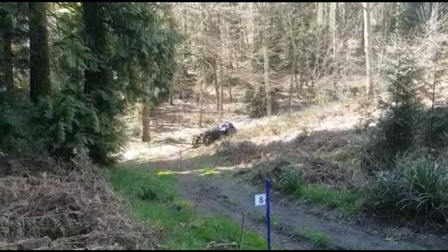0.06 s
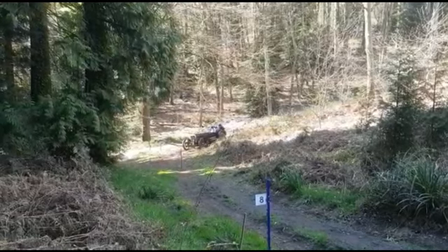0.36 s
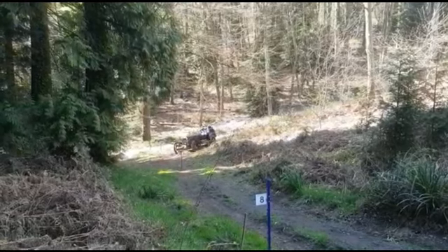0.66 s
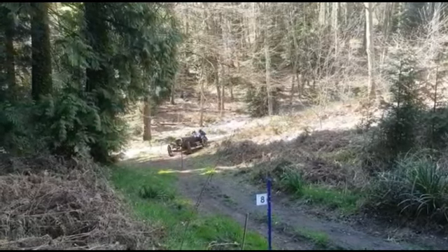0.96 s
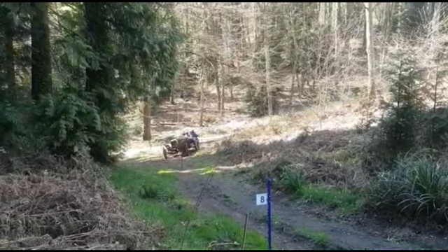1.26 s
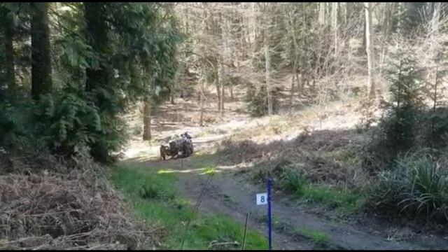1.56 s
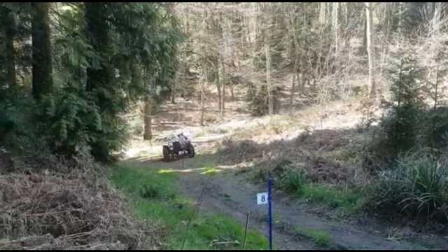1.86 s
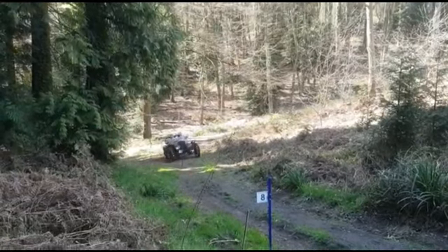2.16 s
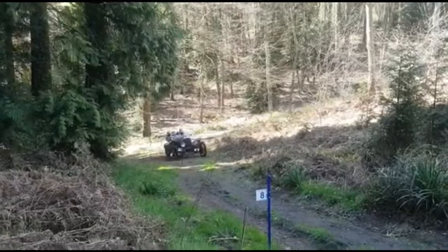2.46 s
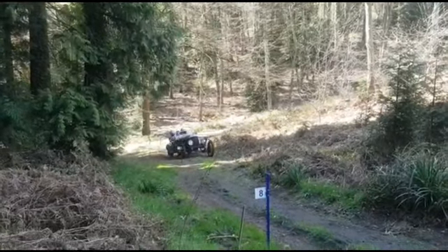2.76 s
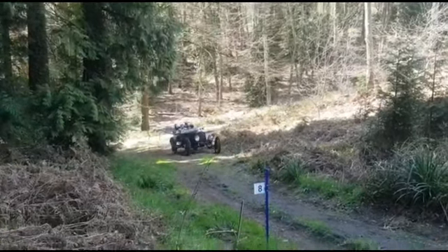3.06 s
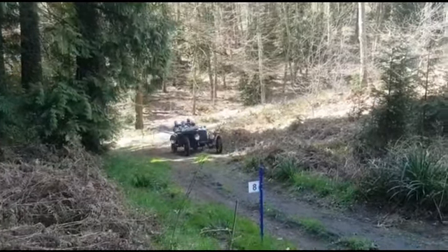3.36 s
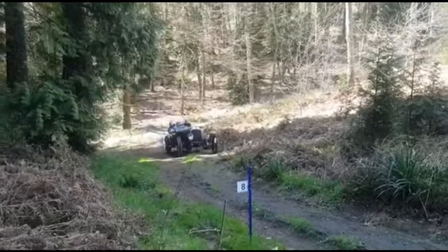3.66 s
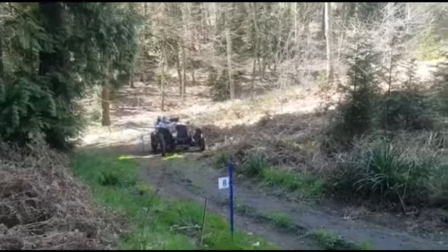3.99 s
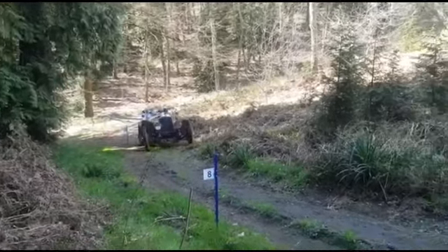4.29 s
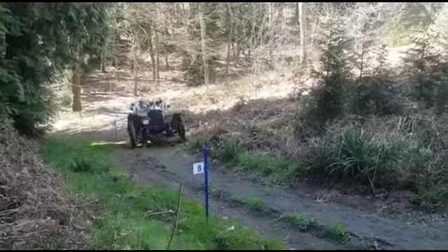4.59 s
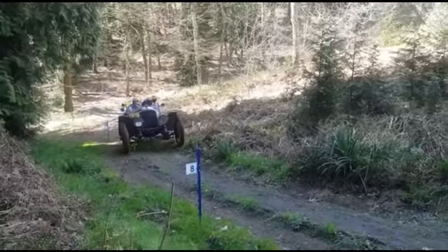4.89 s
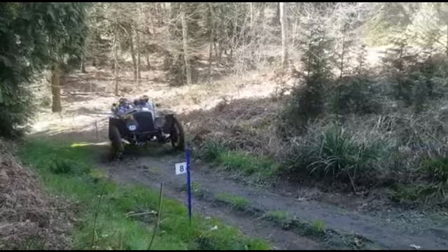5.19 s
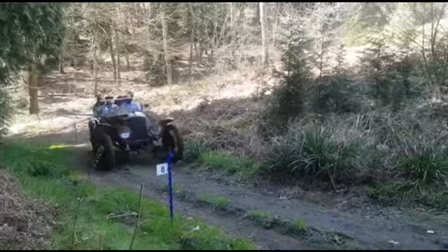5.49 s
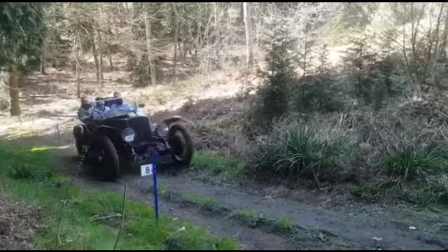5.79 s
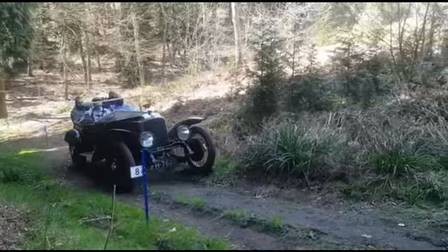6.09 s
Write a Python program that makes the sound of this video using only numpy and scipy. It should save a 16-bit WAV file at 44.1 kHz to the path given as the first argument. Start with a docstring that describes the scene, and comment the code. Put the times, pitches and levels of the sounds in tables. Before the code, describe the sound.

An old car engine chugs and revs unevenly through the woods, drawing closer with light metal rattles and tyres hissing on grit.

```python
"""A vintage four-cylinder car labours along a woodland dirt track towards the listener.
Its exhaust is a pulse train, two firings to a crank turn, which booms and barks at each press of the
throttle. Meshing gears whine, block and valves clatter, tyres hiss over grit, and bumps set the chassis
ringing. Dry twigs snap close by, short squeaks glide past, and the tree trunks scatter the sound."""
import sys
import numpy as np
from scipy import signal
from scipy.fft import rfft, irfft, next_fast_len
from scipy.io import wavfile
from scipy.ndimage import uniform_filter1d

SR = 44100
rng = np.random.default_rng(int(sys.argv[2]) if len(sys.argv) > 2 else 0)


def int16_out(signal):
    """Quantize to a 16-bit WAV file."""
    q = np.round(np.clip(np.atleast_2d(signal).T, -1, 1) * 32767)
    wavfile.write(sys.argv[1], SR, q.astype(np.int16))


N = 275208
SIZE = next_fast_len(N + SR // 8, real=True)
TIME, FREQ = np.arange(N) / SR, np.fft.rfftfreq(SIZE, 1 / SR)
COASTING_DB = -34.5  # the firing note from afar, throttle shut
# Overtones of the exhaust: cycles_per_turn
EXHAUST_ORDERS = [5, 6, 7, 8, 9, 10]


def amp(db):
    """Decibels to amplitude ratio."""
    return 10 ** (np.asarray(db) / 20)


def unit(x):
    """Normalisation to an rms of 1."""
    return x / np.sqrt(np.mean(x ** 2) + 1e-20)


def curve(points):
    """Linear interpolation of (time_s, value) points at every sample."""
    return np.interp(TIME, *np.transpose(points))


def read(points, hz):
    """Interpolation of (frequency_hz, value) points on a logarithmic frequency axis."""
    point_hz, value = np.transpose(points)
    return np.interp(np.log(hz + 1), np.log(point_hz + 1), value)


def filtered(x, response):
    """Linear filtering: the spectrum is multiplied by a frequency response."""
    return irfft(rfft(x, SIZE) * response, SIZE)[..., :N]


def colour(x, spectrum):
    """Minimum-phase filtering: the phase follows from the log gain by the Hilbert transform."""
    hz = abs(np.fft.fftfreq(4096, 1 / SR))
    log_gain = np.log(amp(read(spectrum, hz)))
    taps = np.fft.ifft(np.exp(signal.hilbert(log_gain)).conj()).real
    return filtered(x, rfft(taps[:len(taps) // 2], SIZE))


def ring(x, hz, width_hz):
    """A second-order resonance with a peak gain of 1."""
    return signal.lfilter(*signal.iirpeak(hz, hz / width_hz, SR), x)


def drift(rate_hz, count=8192):
    """Random modulation: low-passed Gaussian noise with an rms of 1."""
    lowpass = np.exp(-(np.fft.rfftfreq(count, TIME[-1] / count) / rate_hz) ** 2)
    slow = irfft(rfft(rng.standard_normal(count)) * lowpass)
    return np.interp(TIME, np.linspace(0, TIME[-1], count), unit(slow))


def spread(pair):
    """Partial coherence: the sum and difference of two unrelated signals give left and right."""
    # Likeness of the two channels: frequency_hz, correlation
    coherence = [(130, 0.2), (290, 0.31), (640, 0.16), (1400, 0.99), (3100, 0.5), (7000, 0.053)]
    alike = read(coherence, FREQ)
    common, apart = filtered(pair, np.sqrt([(1 + alike) / 2, (1 - alike) / 2]))
    return np.array([common + apart, common - apart])


def stereo_noise():
    """White noise, partly coherent between left and right."""
    return spread(rng.standard_normal((2, N)))


def at_level(pair, db):
    """Gain control: the running rms of the channels' mean follows a level curve."""
    power = uniform_filter1d(pair.mean(0) ** 2, size=8000)
    return amp(db) * pair / np.sqrt(abs(power) + 1e-20)


def blows(starts_s, levels_db, rise_s, decay_s):
    """Impact excitation: noise bursts with a fast rise and an exponential decay."""
    t = np.arange(SR // 5) / SR
    shape = (1 - np.exp(-t / rise_s)) * np.exp(-t / decay_s)
    impulses = np.zeros(N)
    np.add.at(impulses, (starts_s * SR).astype(int), amp(levels_db))
    return signal.fftconvolve(impulses, shape / shape.max())[:N] * stereo_noise()


def bursts(turns, decay_strokes, uneven_db):
    """Modulation at the firing rate: an envelope jumps twice a turn to a random height and decays."""
    stroke = (2 * turns).astype(int)
    strength = np.clip(rng.standard_normal(N), -2, 1.4)
    return amp(uneven_db * strength[stroke]) * np.exp(-(2 * turns % 1) / decay_strokes)


def orders(turns, multiples, levels_db, flutter_db, smear_rad):
    """Multipath fading: tones at multiples of the crank speed waver in level and phase."""
    tones = (amp(db + flutter_db * drift(18)) * np.cos(2 * np.pi * k * turns + smear_rad * drift(29))
             for k, db in zip(multiples, levels_db))
    return np.sqrt(2) * sum(tones)


def trees(x, wet_db, echoes_per_s=1500, onset_s=0.0033, path_shift_hz=0.35):
    """Scattering: trunks add sparse echoes whose treble dies first; the paths shift as the car moves."""
    # Reverberation time of the wood: frequency_hz, t60_s
    reverberation = [(100, 0.88), (500, 1), (2000, 0.47), (6000, 0.37), (15000, 0.35)]
    taps = rng.standard_normal((2, 2, SR)) * (rng.random((2, 2, SR)) < echoes_per_s / SR)
    hz, t, spectra = signal.stft(taps, SR, nperseg=256)
    decay = amp(-60 * t / read(reverberation, hz)[:, None])
    tails = signal.istft(spectra * decay * np.minimum(t / onset_s, 1), SR, nperseg=256)[1]
    angle = 2 * np.pi * path_shift_hz * TIME
    echoes = np.zeros((2, N))
    for share, tail in zip((np.cos(angle), np.sin(angle)), tails):  # crossfade two sets of paths
        response = tail / np.linalg.norm(tail[0])
        echoes += signal.fftconvolve(np.atleast_2d(x * share), response, axes=1)[:, :N]
    return x + amp(wet_db) * spread(echoes)


def squeaks(roughness=0.028):
    """Frequency modulation: short, rough glides, as of springs or far birds."""
    # Squeaks and chirps: start_s, length_s, start_hz, end_hz, level_db
    glides = [(0.866, 0.11, 4050, 4920, -54), (2.3, 0.045, 4180, 2760, -44.5),
              (3.165, 0.028, 2836, 2800, -40.5), (3.485, 0.016, 3150, 3120, -46.5),
              (6.16, 0.011, 3740, 2920, -29)]
    wobble = 1 + roughness * drift(310)
    out = np.zeros(N)
    for start_s, length_s, start_hz, end_hz, level_db in glides:
        progress = np.clip((TIME - start_s) / length_s, 0, 1)
        pitch_hz = (start_hz + (end_hz - start_hz) * progress) * wobble
        out += amp(level_db) * np.sin(np.pi * progress) * np.sin(2 * np.pi * np.cumsum(pitch_hz) / SR)
    return trees(out, wet_db=-6)


def twigs():
    """Brittle fracture: each dry twig gives a bright crack and a damped, woody knock."""
    # Twig snaps: start_s, crack_db, knock_db
    snaps = [(0.397, -43, -41), (0.438, -44, -36), (0.45, -32, -50), (0.4623, -39, -39.5),
             (0.486, -53, -36), (0.575, -44, -37.5), (0.609, -63, -36), (0.6626, -58, -40.5)]
    # Spectrum of a crack: frequency_hz, gain_db
    crack_spectrum = [(1000, -1), (4500, 18), (6200, -9), (8000, 12), (12000, -2), (15500, -6)]
    starts_s, crack_db, knock_db = np.transpose(snaps)
    cracks = colour(blows(starts_s, crack_db - 13, rise_s=0.00055, decay_s=0.0016), crack_spectrum)
    knocks = ring(blows(starts_s, knock_db + 8, rise_s=0.00028, decay_s=0.0027), hz=2140, width_hz=930)
    return trees(cracks, wet_db=-5.5) + trees(knocks, wet_db=0.5)


def clinks(starts_s, levels_db, attack_s=0.001):
    """Free vibration: loose metalwork rings in damped modes after each jolt, never quite alike."""
    # Modes of the metalwork: pitch_hz, level_db, t60_s
    metal_modes = [(2070, 3.5, 0.069), (2280, 3, 0.079), (2805, -2.5, 0.039), (3200, 3, 0.042),
                   (4280, -11, 0.065), (5020, -1, 0.036)]
    pitch_hz, mode_db, t60_s = np.transpose(metal_modes)[:, :, None]
    out, t = np.zeros(N + SR), np.arange(SR // 5) / SR
    for start_s, level_db in zip(starts_s, levels_db):
        detune, strength, phase = rng.standard_normal((3, len(metal_modes), 1))
        envelopes = amp(mode_db + 2 * strength - 60 * t / t60_s)
        modes = envelopes * np.sin(2 * np.pi * (pitch_hz * (1 + 0.012 * detune) * t + phase))
        out[int(start_s * SR):][:len(t)] += amp(level_db) * modes.sum(0) * np.minimum(t / attack_s, 1)
    return out[:N]


def rattles():
    """Shock excitation: bumps drive the resonances of panels, fittings and metalwork."""
    # Jolts of the chassis: start_s, panel_db, fitting_db
    jolts = [(4.166, -49, -71), (1.327, -48, -67), (1.396, -58, -63.5), (1.655, -49.5, -65.5),
             (1.825, -60, -82), (1.945, -55.5, -64.5), (2.033, -54, -67.5), (4.273, -51.5, -67),
             (2.573, -47, -67), (2.667, -54, -64.5), (3.656, -50, -74), (3.959, -49.5, -63),
             (4.017, -51, -68), (4.344, -60, -76), (4.449, -50.5, -61.5), (4.525, -46, -64),
             (4.855, -53, -81), (4.995, -51, -73), (5.084, -49, -62), (5.231, -46, -59.5),
             (5.342, -52, -62), (5.398, -42.5, -60), (5.928, -40.5, -56.5), (5.982, -44, -60),
             (6.022, -43, -57.5), (6.114, -41.5, -60), (6.199, -41, -73)]
    # Response of the panels: frequency_hz, gain_db
    panel_spectrum = [(500, -35), (1000, 19), (1600, 14), (2150, 21.5), (3100, 13.5), (4200, 10),
                      (6200, -61.5), (15000, -99.5)]
    # Response of the small loose parts: frequency_hz, gain_db
    fitting_spectrum = [(2500, -32.5), (4400, 14.5), (5300, 6.5), (6300, -6), (8000, 1.5), (9500, -7),
                        (11500, 4), (15500, -51)]
    starts_s, panel_db, fitting_db = np.transpose(jolts)
    panels = colour(blows(starts_s, panel_db - 5, rise_s=0.00029, decay_s=0.015), panel_spectrum)
    fittings = colour(blows(starts_s, fitting_db + 10, rise_s=0.0012, decay_s=0.016), fitting_spectrum)
    return trees(panels + fittings + clinks(starts_s, panel_db), wet_db=-4.5)


def grit(level_db, grains_per_s=450, grain_db=-4):
    """Shot noise: tyres grinding over dirt give separate random clicks within a fine hiss."""
    # Spectrum of tyres on grit: frequency_hz, gain_db
    tyre_spectrum = [(1500, -17.5), (4500, -8), (6200, -23.5), (7800, -13.5), (9400, -21.5), (11000, -9.5),
                     (12000, -9), (13500, -17), (15600, -21.5)]
    contacts = rng.random((2, N)) < grains_per_s / SR
    grains = contacts * amp(4.6 * np.minimum(rng.exponential(1, (2, N)), 5) + 3.2 * drift(18))
    hiss = unit(rng.standard_normal((2, N))) + amp(grain_db) * unit(grains)
    ruts_db = 2.5 * drift(8.5)
    return at_level(colour(hiss, tyre_spectrum), level_db - 1 + ruts_db)


def whine(turns, speed, gain_db):
    """Gear meshing: tones at fixed multiples of the crank speed peak where the gearbox resonates."""
    # Meshing tones: cycles_per_turn
    mesh_orders = [13.5, 18, 22.5, 27]
    # Response of the gearbox: pitch_hz, level_db
    gearbox = [(480, -65), (515, -57.5), (560, -66), (640, -70), (720, -60), (790, -61.5), (850, -68),
               (960, -60), (1100, -65), (1400, -74)]
    levels_db = [gain_db + read(gearbox, k * speed) for k in mesh_orders]
    return trees(orders(turns, mesh_orders, levels_db, flutter_db=3, smear_rad=0.5), wet_db=-6)


def clatter(turns, level_db):
    """Structure-borne sound: the block radiates a knock each stroke over a hum of high crank orders."""
    # Response of the engine block: frequency_hz, gain_db
    block_spectrum = [(300, -48.5), (620, 1.5), (780, 4.5), (1000, -2), (1300, -4.5), (1650, -14),
                      (2200, -51), (6000, -90)]
    knocks = unit(stereo_noise() * (0.5 + bursts(turns, decay_strokes=1, uneven_db=9)))
    multiples = np.arange(19, 32)
    hum = orders(turns, multiples, np.full(len(multiples), -18), flutter_db=0, smear_rad=1.94)
    return at_level(trees(colour(knocks + hum, block_spectrum), wet_db=0.5), level_db - 0.3)


def valves(turns, level_db):
    """Directivity: the valve gear rasps in step with the crank, shrillest from the engine's side."""
    # Spectrum of the valve gear: frequency_hz, gain_db
    valve_spectrum = [(1000, -9.5), (1700, -5), (2000, 4.5), (2250, 2.5), (2450, -4.5), (3000, -20),
                      (3800, -17), (4900, -15), (6200, -32), (12000, -43)]
    # Shrill resonance as the engine's side turns to and from the listener: time_s, gain_db
    flank = [(0, 0), (1.4, 3.5), (1.75, -0.5), (3.7, -1), (4.7, -6), (6.24, -1.5)]
    ticks = stereo_noise() * (1 + bursts(turns, decay_strokes=0.52, uneven_db=12))
    shrill = ring(ring(ticks, hz=2700, width_hz=600), hz=2810, width_hz=830) * amp(curve(flank))
    return at_level(trees(colour(ticks, valve_spectrum) + shrill, wet_db=0), level_db - 0.6)


def firings(turns, alternate_db=2, uneven_db=2.5, jitter_s=0.0003):
    """A jittered pulse train: two firings a turn, alternately weaker and stronger."""
    onsets = np.flatnonzero(np.diff(np.floor(2 * turns)))
    size, lateness = rng.standard_normal((len(onsets), 2)).T
    onsets = np.clip(onsets + (lateness * jitter_s * SR).astype(int), 0, N - 1)
    pulses = np.zeros(N)
    pulses[onsets] = amp(uneven_db * size + alternate_db * (np.arange(len(onsets)) % 2))
    return unit(pulses)


def burble(turns, level_db, puff_db=2.5):
    """Source and filter: each firing sends a slug of gas and a rough puff through the resonant pipe."""
    # Response of the tailpipe: frequency_hz, gain_db
    pipe_spectrum = [(60, -27), (125, -5.5), (165, 3.5), (230, -7), (300, -16.5), (380, -17), (500, -16),
                     (620, -57.5), (900, -26), (2000, -90.5)]
    puffs = unit(stereo_noise() * (bursts(turns, decay_strokes=0.2, uneven_db=-11) - 1))
    gas = firings(turns) + amp(puff_db) * puffs
    lumps = amp(1.8 * drift(20))
    return at_level(trees(colour(gas * lumps, pipe_spectrum), wet_db=-6), level_db + 5)


def growl(turns, speed, burble_db):
    """Harmonics of the exhaust bend with the revs, swelling as they cross the pipe's resonances."""
    # Strength of an overtone against the burble: pitch_hz, gain_db
    overtone_spectrum = [(190, -7), (225, -6), (255, -10), (290, -1), (335, -11), (370, -15), (400, -6),
                         (435, -14), (505, -6), (550, -20)]
    levels_db = [burble_db + read(overtone_spectrum, k * speed) for k in EXHAUST_ORDERS]
    return orders(turns, EXHAUST_ORDERS, levels_db, flutter_db=3, smear_rad=0.55)


def bark(turns, speed, strength):
    """Forced resonance: a stab of throttle drives the pipe's overtones and hard puffs, equal in power."""
    # Spectrum of the pipe under full throttle: frequency_hz, gain_db
    bark_spectrum = [(120, -48), (220, 10.5), (320, 3), (430, -4.5), (520, -6), (700, -66), (2000, -78.5)]
    puffs = stereo_noise() * bursts(turns, decay_strokes=0.31, uneven_db=7)
    levels_db = [read(bark_spectrum, k * speed) for k in EXHAUST_ORDERS]
    tones = orders(turns, EXHAUST_ORDERS, levels_db, flutter_db=4.5, smear_rad=1)
    return strength * (unit(tones) + unit(colour(puffs, bark_spectrum))) / np.sqrt(2)


def boom(turns, firing_db, burble_db, pipe_lag_turns=0.06):
    """Engine orders 1 to 4: the firing note is the second; unequal cylinders add the odd ones."""
    chug_db = -37 + 0.6 * (firing_db - firing_db.mean())
    out = np.zeros(N)
    for k, level_db in enumerate([chug_db, firing_db, burble_db + 13, burble_db + 4], 1):
        waver = 1 + 0.18 * drift(20) + 0.22j * drift(22)  # no two turns burn alike in strength or timing
        cycles = k * (turns - pipe_lag_turns * k)  # dispersion: the pipe delays higher orders more
        out += amp(level_db) * (waver * np.exp(2j * np.pi * cycles)).real
    return out


def driving(open_s=0.039, shut_s=0.063, bark_fade_s=0.43):
    """Superposition of throttle presses: each swells, holds and dies away, while its bark fades."""
    # Presses of the throttle: start_s, length_s, firing_db, bark_db, added_rasp_db, wheelspin_db
    presses = [(0.0, 0.024, -13.5, -66, 1, -18), (0.152, 0.19, -18.5, -46, 4.5, -2),
               (0.351, 0.15, -26.5, -69, 1.5, -18), (0.621, 0.26, -25.5, -78, -1, -10.5),
               (0.94, 0.2, -21.5, -44, 3.5, -7), (1.25, 0.32, -19.5, -41, 4.5, -3.5),
               (1.6, 0.34, -19, -37, 3, -0.5), (2.06, 0.093, -23, -65, -0.5, -4),
               (2.251, 0.13, -23, -42, 3.5, 3), (2.68, 0.19, -26, -48, 2.5, -1),
               (3.003, 0.14, -22, -37, 1, 3), (3.147, 0.19, -23, -35.5, 2, 2),
               (3.289, 0.6, -22.5, -39.5, 0, -1), (3.945, 0.21, -22, -44.5, 0.5, 0),
               (4.487, 0.17, -31, -41, 0, -2.5), (4.739, 0.33, -39.5, -51, -0.5, -4),
               (5.213, 0.24, -34, -47, 0, -2.5), (5.658, 0.15, -28.5, -40, 1, 0),
               (6.053, 0.18, -23.5, -39.5, 3.5, -1.5)]
    firing, bark_strength, rasp_db, spin_db = amp(COASTING_DB), 0, 0, 0
    for start_s, length_s, firing_db, bark_db, added_rasp_db, wheelspin_db in presses:
        age_s = TIME - start_s
        held = (1 + np.tanh(age_s / open_s)) * (1 - np.tanh((age_s - length_s) / shut_s)) / 4
        firing += amp(firing_db) * held
        bark_strength += amp(bark_db) * held * np.exp(-np.maximum(age_s, 0) / bark_fade_s)
        rasp_db += added_rasp_db * held
        spin_db += wheelspin_db * held
    throttle_db = 20 * np.log10(firing) - COASTING_DB
    return throttle_db, bark_strength, rasp_db, spin_db


def scene():
    """Phase locking: one crank times all engine sounds; engine and tyres grow louder as the car nears."""
    # Crank speed, rising with the presses and sagging as the car labours: time_s, turns_per_s
    crank = [(0, 41.5), (.11, 41.2), (.2, 53), (.28, 53), (.4, 46.5), (.68, 46.3), (.76, 43.8), (.86, 43.3),
             (.96, 49.8), (1.06, 50), (1.2, 44.3), (1.33, 50.3), (1.44, 50.4), (1.6, 45.7), (1.74, 51.2),
             (1.96, 50.6), (2.23, 44.3), (2.33, 46.2), (2.5, 40.6), (2.73, 43), (2.92, 38.7), (3.18, 46),
             (3.36, 45.8), (3.46, 43.5), (3.65, 43.7), (3.77, 46.5), (3.9, 44), (4.05, 45.5), (4.2, 42.3),
             (4.42, 40.6), (4.58, 42.6), (4.75, 40.3), (5, 39.4), (5.16, 37.8), (5.38, 39.6), (5.6, 37.3),
             (5.74, 41.7), (5.95, 37.4), (6.15, 44.4), (6.24, 44)]
    # Range of the car: time_s, distance_m
    approach = [(0, 37), (2.4, 56), (3.2, 32), (4.3, 24.8), (4.9, 17.8), (5.7, 11.1), (6.24, 9.2)]
    # Directivity of the tailpipe as the car rounds the bend: time_s, gain_db
    tailpipe = [(0, -2), (.8, -6), (1.2, -1.5), (6.24, 0.5)]
    speed = uniform_filter1d(curve(crank), size=2400)  # the flywheel's inertia rounds each change
    turns = np.cumsum(speed) / SR
    throttle_db, bark_strength, rasp_db, spin_db = driving()
    distance_m = curve(approach)
    halvings = np.log2(distance_m[0] / distance_m)
    pipe_gain_db = 4.5 * halvings
    burble_db = -47 + 3.32 * halvings + 0.044 * throttle_db + curve(tailpipe)
    clatter_db = -55.5 + 6.1 * halvings + 0.062 * throttle_db + rasp_db
    valve_db = -53.5 + 3.53 * halvings + 0.026 * throttle_db + rasp_db
    grit_db = -64 + 6.5 * halvings + 0.055 * throttle_db + spin_db
    gear_db = -3 + 5 * halvings + rasp_db
    firing_note = boom(turns, COASTING_DB + throttle_db + pipe_gain_db, burble_db)
    exhaust = firing_note + burble(turns, burble_db) + bark(turns, speed, bark_strength * amp(pipe_gain_db))
    engine = clatter(turns, clatter_db) + valves(turns, valve_db)
    track = grit(grit_db) + rattles() + twigs() + squeaks()
    return exhaust + growl(turns, speed, burble_db) + whine(turns, speed, gear_db) + engine + track


def record(dry, right_delay_s=0.0001, cutoff_hz=15750):
    """Level and time differences: the left is thin in the bass, the right later and dull; then a low-pass."""
    # Balance of the channels: frequency_hz, left_minus_right_db
    balance = [(60, -22), (92, -19), (140, -20), (210, -16), (330, -6), (500, -2.5), (770, 4.5),
               (1170, -3.5), (1790, 5.5), (2740, -6), (4190, -1), (6410, 18.5), (9810, 11), (15000, 12)]
    ratio = amp(read(balance, FREQ))
    delay = np.exp(-2j * np.pi * FREQ * right_delay_s)
    channels = filtered(dry, 2 * np.array([ratio, delay]) / (1 + ratio))
    lowpass = signal.firwin(1023, cutoff_hz, window=("kaiser", 9), fs=SR)
    return signal.oaconvolve(channels, lowpass[None], "same")


dry = scene()
out = record(dry)
int16_out(out)
```